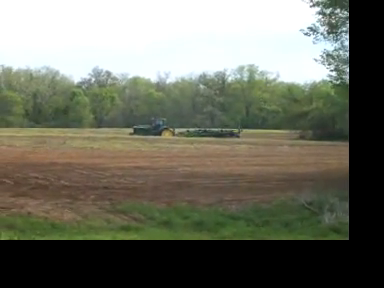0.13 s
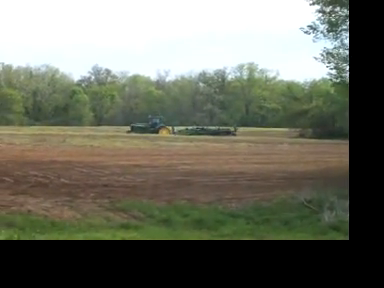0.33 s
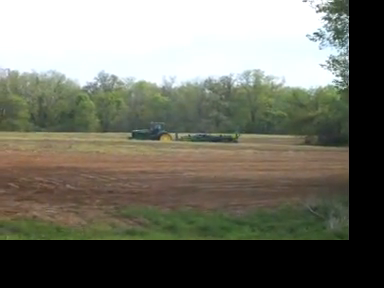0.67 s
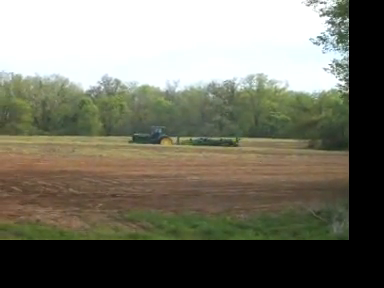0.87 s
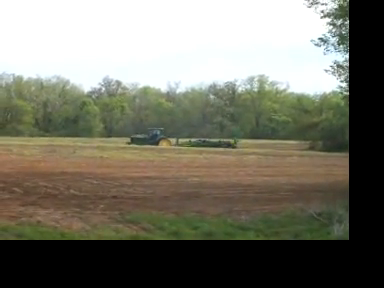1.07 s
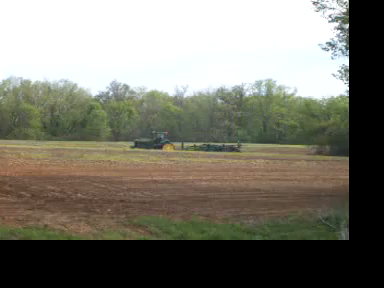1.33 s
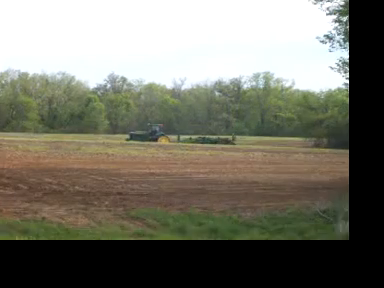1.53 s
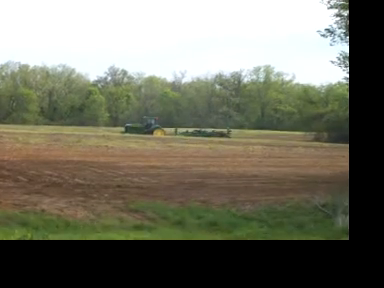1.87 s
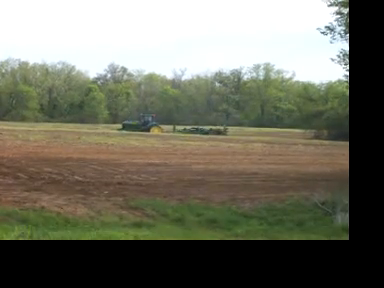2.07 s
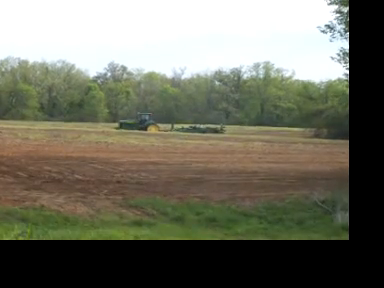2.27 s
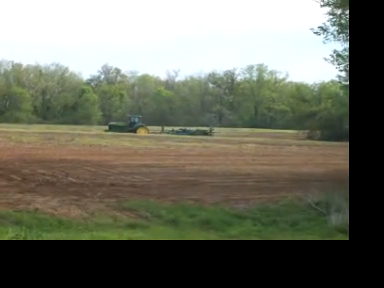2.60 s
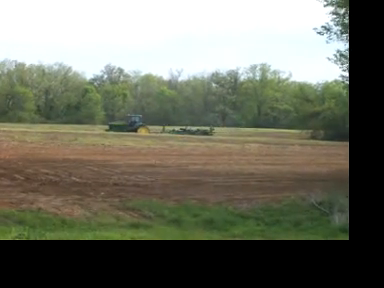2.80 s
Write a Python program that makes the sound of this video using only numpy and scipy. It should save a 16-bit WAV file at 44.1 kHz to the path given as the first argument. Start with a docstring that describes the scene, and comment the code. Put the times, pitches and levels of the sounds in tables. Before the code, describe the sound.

A diesel tractor pulling a planter drones continuously far across an open field, low hum with blurred knocking and rattle; a faint chirp at the start, a tiny tick midway, distant dull microphone.

```python
"""An open field: a six-cylinder diesel tractor pulls a planter, far from the microphone.
The exhaust drones in partials of the firing rate; noise bursts at each firing ring as block knock
and injector clatter; pump, gears and whistles are wavering sines.
Moving air makes the upper sounds waver over a low noise rumble.
One faint chirp (a sine with rasp) and one small tick (a step and a pulse) pass."""
import sys
import numpy as np
from scipy import signal
from scipy.fft import rfft, irfft
from scipy.io import wavfile
from scipy.ndimage import uniform_filter1d

SR = 44100
rng = np.random.default_rng(int(sys.argv[2]) if len(sys.argv) > 2 else 0)


def put_to_file(sound):
    """Save the sound as 16-bit audio at rate SR, in the file named by the first command-line argument."""
    columns = np.atleast_2d(sound).T  # one column per channel
    safe = np.clip(columns, -1, 1)
    whole_steps = np.round(safe * 32767)
    wavfile.write(sys.argv[1], SR, whole_steps.astype(np.int16))


N = 129213

# engine speed, sagging under load and recovering: time_s, firing_rate_hz
ENGINE_SPEED = [(0, 71.4), (.25, 72.6), (.41, 72.5), (.56, 70.9), (.8, 72.3), (.94, 73.7), (1.07, 73.3),
                (1.3, 73.8), (1.58, 74.5), (1.75, 73.8), (2., 74.1), (2.22, 72.4), (2.45, 74.9),
                (2.68, 73.1), (2.93, 72.7)]
# cylinders in firing order: relative blow strength [dB]
CYLINDER_DB = [2.5, -1, 1, -4.5, 1.5, -5]
# levels at the microphone, before each source's trim: time_s, knock_db, clatter_db
CARRY_LEVELS = [(0, -31.5, -40.5), (.15, -32, -38), (.55, -31, -37), (.8, -30.5, -36.5), (1.05, -30.5, -35),
                (1.35, -29, -35), (1.62, -31, -34), (1.95, -31.5, -35), (2.12, -30.5, -34.5),
                (2.5, -32, -34.5), (2.93, -32.5, -35.5)]
AIR_HZ = 11  # rate of the slow waver in moving air


def undb(db):
    """Decibels to amplitude gain."""
    return 10 ** (np.asarray(db) / 20)


def unit(x):
    """Scale to rms 1 about the mean."""
    return x / np.std(x)


def curve(rows, column=1):
    """One table column, joined by straight lines in time."""
    rows = np.array(rows)
    return np.interp(np.arange(N) / SR, rows[:, 0], rows[:, column])


def colour(x, points):
    """Shape a spectrum by (Hz, dB) points joined over log frequency; rms 1."""
    hz, db = np.array(points).T
    bins_hz = np.maximum(np.fft.rfftfreq(N, 1 / SR), 1)
    gain_db = np.interp(np.log(bins_hz), np.log(hz), db, left=-80, right=-80)
    return unit(irfft(rfft(x) * undb(gain_db), N))


def walk(rate_hz):
    """Smooth random drift with spread 1: held noise, averaged twice."""
    hold = int(SR / rate_hz)
    held = np.repeat(rng.standard_normal(N // hold + 2), hold)
    smooth = uniform_filter1d(uniform_filter1d(held, hold), hold)
    return unit(smooth[:N])


def tone(turns, fade_db, wander_rad):
    """A sine, rms 1 before fading; strength and phase waver on the way across the field."""
    flutter_hz = 40.15
    drift = walk(AIR_HZ) + walk(flutter_hz) / 2
    phase = 2 * np.pi * turns + wander_rad * drift
    return np.sqrt(2) * np.sin(phase) * undb(fade_db * walk(AIR_HZ))


def blows(firings, decay_s, scatter_db, repeat, hold):
    """A noise burst per firing: part fixed per cylinder, part new, with a lingering tail."""
    size = SR // 12
    smear_s = .004  # distance softens each onset
    starts = np.flatnonzero(np.diff(np.floor(firings), prepend=-1))
    own = rng.standard_normal((len(CYLINDER_DB), size))
    fresh = rng.standard_normal((len(starts), size))
    age_s = np.arange(size) / SR
    onset = 1 - np.exp(-age_s / smear_s)
    tail = hold * np.linspace(1, 0, size)
    envelope = onset * (np.exp(-age_s / decay_s) + tail)
    out = np.zeros(N + size)
    for k, start in enumerate(starts):
        cylinder = k % len(CYLINDER_DB)
        burst = np.sqrt(repeat) * own[cylinder] + np.sqrt(1 - repeat) * fresh[k]
        strength_db = CYLINDER_DB[cylinder] + scatter_db * fresh[k, -1]
        out[start:start + size] += burst * envelope * undb(strength_db)
    out[:size] += out[N:]  # the engine is already running at the start
    return out[:N]


def rumble():
    """Low rumble of machine and open air: shaped noise."""
    # freq_hz, relative density_db
    spectrum = [(8, -13.5), (16, -4), (30, 1), (55, 0), (92, -5.5), (130, -2.5), (165, 1), (195, -6),
                (230, -5), (260, -13), (300, -23.5), (500, -25), (1500, -41)]
    return undb(-31.5) * colour(rng.standard_normal(N), spectrum)


def chirp():
    """One faint, short, high chirp: a sine and rasping noise under a Gaussian envelope."""
    # rasp: freq_hz, relative density_db
    rasp_spectrum = [(3000, -18), (3250, 1), (3700, -6), (4000, -7), (4400, -26)]
    centre_s, pitch_hz, width_s, level_db, rasp_db = .1, 3193, .012, -35.5, -4
    t = np.arange(N) / SR - centre_s
    rasp = undb(rasp_db) * colour(rng.standard_normal(N), rasp_spectrum)
    envelope = undb(level_db) * np.exp(-(t / width_s) ** 2)
    return envelope * (np.sin(2 * np.pi * pitch_hz * t) + rasp)


def tick():
    """One small dry tick: a sign-flipping step, fading to both sides, less a short thump pulse."""
    centre_s, decay_s, step_db = 1.387, 0.0037, -20
    thump_width_s, thump_db = .0005, -16.5
    t = np.arange(N) / SR - centre_s
    step = undb(step_db) * np.sign(t) * np.exp(-np.abs(t) / decay_s)
    thump = undb(thump_db) * np.exp(-(t / thump_width_s) ** 2)
    return step - thump


def whine(firings):
    """Pump and gear sines follow the engine speed; thin whistles hold their pitch."""
    # pump and gears: multiple of firing rate, level_db
    pump_tones = [(3.23, -42.5), (6.46, -48), (9.69, -46), (13, -45), (13.6, -45)]
    # timing gear: time_s, level_db
    gear_levels = [(0, -44), (.6, -40.5), (.85, -36.5), (1.28, -33.5), (1.5, -44), (1.95, -42.5),
                   (2.2, -41.5), (2.52, -35), (2.93, -42.5)]
    # whistles: pitch_hz, level_db
    whistles = [(1461, -55.5), (2600, -52), (3605, -64)]
    gear_order = 12  # multiple of firing rate
    t = np.arange(N) / SR
    pump = sum(undb(db) * tone(k * firings, fade_db=2.5, wander_rad=.5) for k, db in pump_tones)
    gear = undb(curve(gear_levels)) * tone(gear_order * firings, fade_db=1.6, wander_rad=.35)
    whistle = sum(undb(db) * tone(hz * t, fade_db=3.0, wander_rad=0.54) for hz, db in whistles)
    return pump + gear + whistle


def clatter(firings):
    """Injectors and valves rattle: bursts through their ring, smeared by distance."""
    # injectors and valve gear: freq_hz, relative density_db
    gear_ring = [(1300, -22), (1700, -12.5), (2000, -8), (2270, 0.5), (2490, -6), (2580, 2.5), (2730, 0),
                 (3080, -8), (3400, -7.5), (3780, -6.5), (4000, -19.5), (4250, -21), (4500, -41)]
    trim_db, waver_db = 0.5, .2
    bursts = blows(firings, decay_s=0.032, scatter_db=1., repeat=.1, hold=0.17)
    level_db = trim_db + curve(CARRY_LEVELS, column=2) + waver_db * walk(AIR_HZ)
    return colour(bursts, gear_ring) * undb(level_db)


def knock(firings):
    """Combustion knocks ring the engine block; tails linger in echoes from ground and trees."""
    # engine block: freq_hz, relative density_db
    block_ring = [(280, -24.5), (370, -9.5), (510, -10), (585, -0.5), (635, -5), (715, 3), (765, -1.5),
                  (865, 1.5), (925, -4.5), (970, 1), (1060, -3), (1130, -2), (1270, -15), (1430, -14.5),
                  (1620, -26), (2000, -23)]
    trim_db, waver_db = -0.18, 0.26
    bursts = blows(firings, decay_s=0.011, scatter_db=0.72, repeat=.35, hold=0.25)
    level_db = trim_db + curve(CARRY_LEVELS, column=1) + waver_db * walk(AIR_HZ)
    return colour(bursts, block_ring) * undb(level_db)


def exhaust(firings):
    """Muffled gas pulses as sine partials; unequal cylinders add weak partials in between."""
    # multiple of firing rate (rounded to sixths below), level_db at cruise
    partials = [(1 / 2, -48.5), (0.98, -24), (3 / 2, -41.5), (2, -27.5), (13 / 6, -41), (3, -51), (5, -58)]
    cruise_hz, swell_db_per_hz = 73.3, .5  # weaker when the speed sags
    throb_db, throb_hz = .4, 22
    count = len(CYLINDER_DB)
    wave = np.zeros(N)
    for multiple, db in partials:
        order = round(multiple * count) / count
        wave -= undb(db) * np.sin(2 * np.pi * order * firings)
    swell_db = swell_db_per_hz * (curve(ENGINE_SPEED) - cruise_hz)
    return np.sqrt(2) * wave * undb(swell_db + throb_db * walk(throb_hz))


def scene():
    """All engine sounds run from one count of firings, over the rumble and chirp."""
    firings = np.cumsum(curve(ENGINE_SPEED)) / SR
    background = rumble() + chirp()
    engine = whine(firings) + clatter(firings) + knock(firings) + exhaust(firings)
    return (background + engine)[None]


def low_pass(x, cutoff_hz):
    """Steep elliptic low-pass."""
    return signal.sosfilt(signal.ellip(10, .2, 80, cutoff_hz, fs=SR, output="sos"), x)


def record(dry):
    """A narrow-band recorder that ticks once; the very top is cut."""
    narrow = low_pass(dry, 4450)
    return low_pass(narrow + tick(), 15900)


dry = scene()
out = record(dry)
put_to_file(out)
```